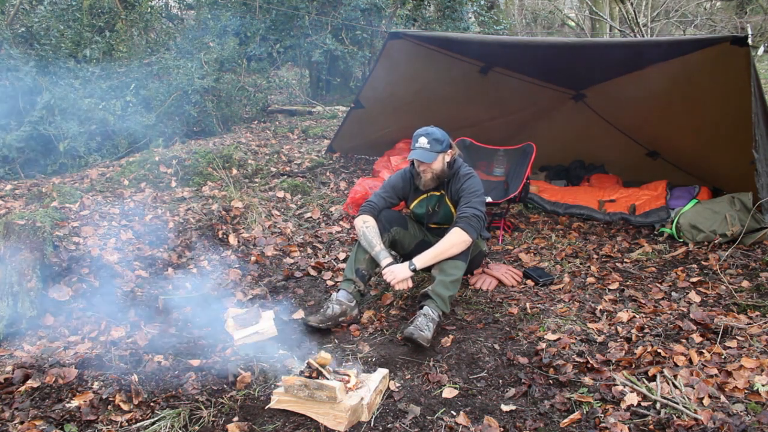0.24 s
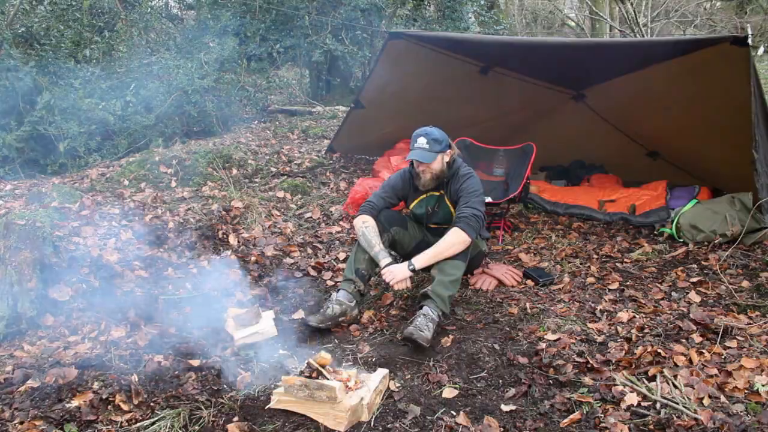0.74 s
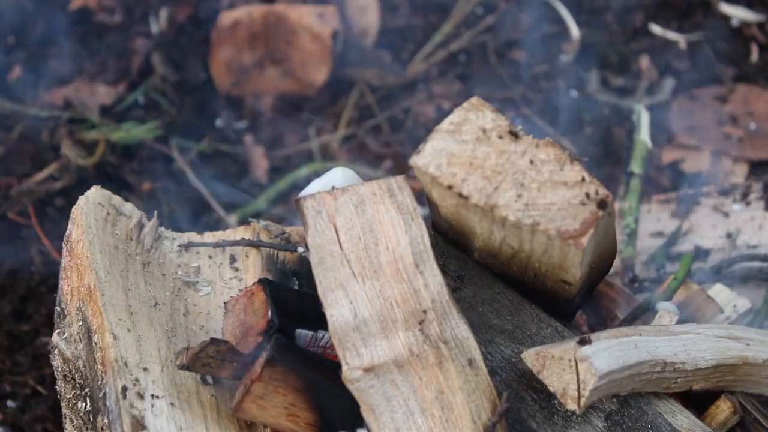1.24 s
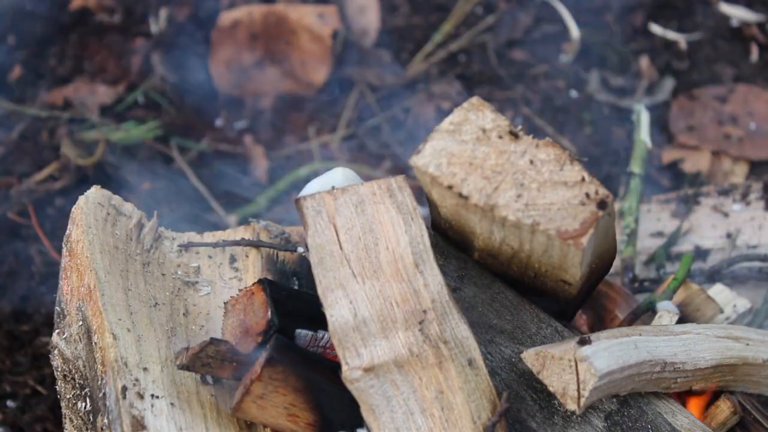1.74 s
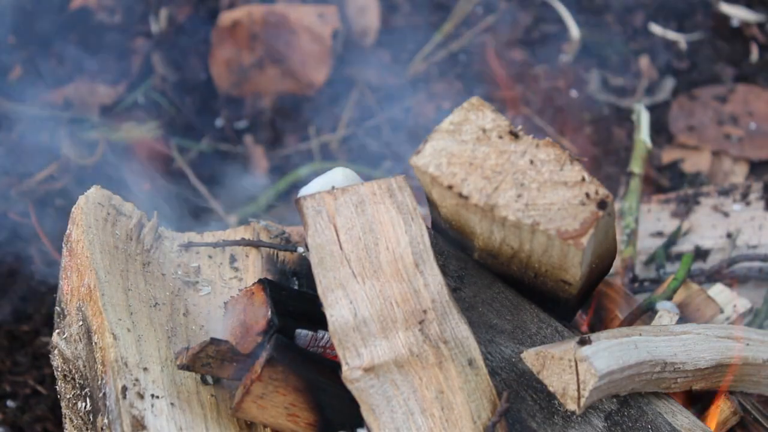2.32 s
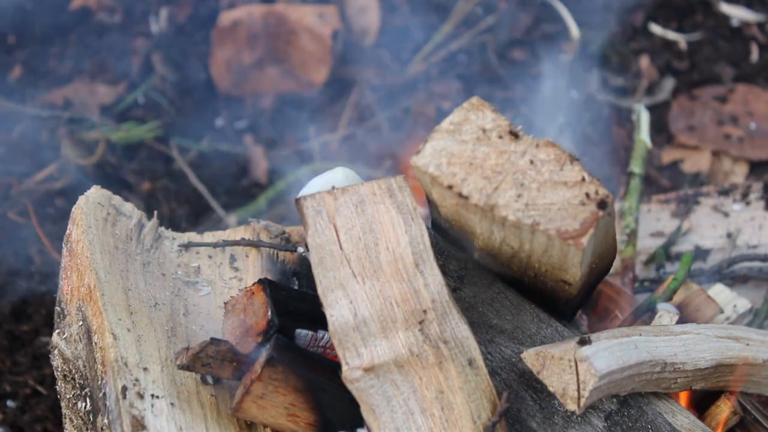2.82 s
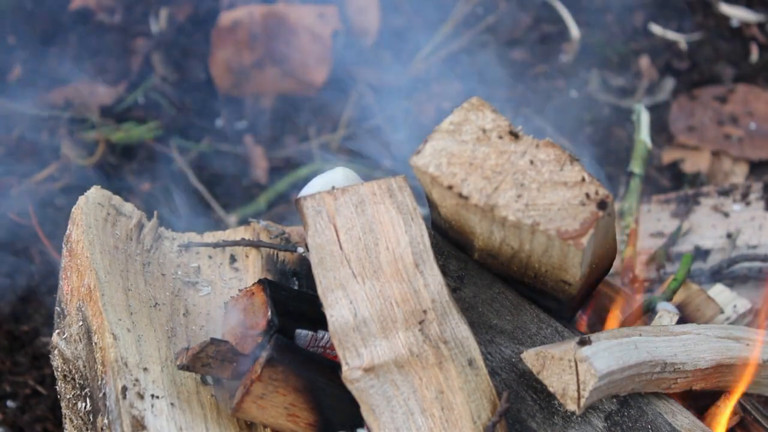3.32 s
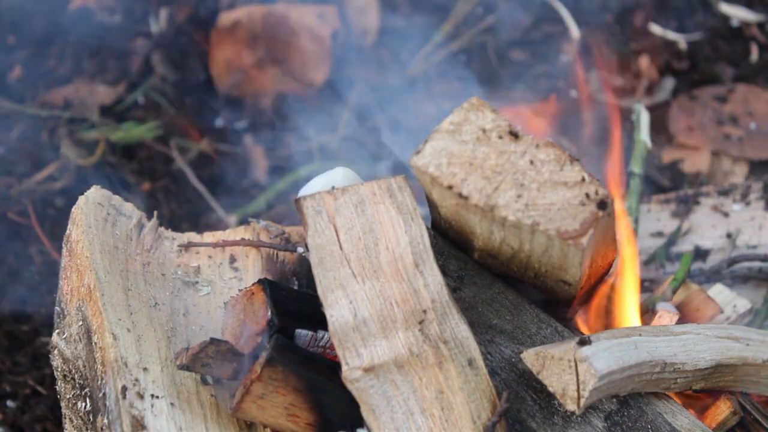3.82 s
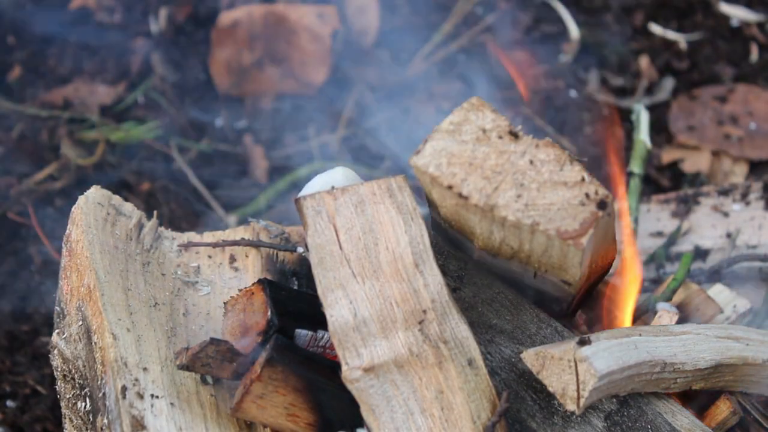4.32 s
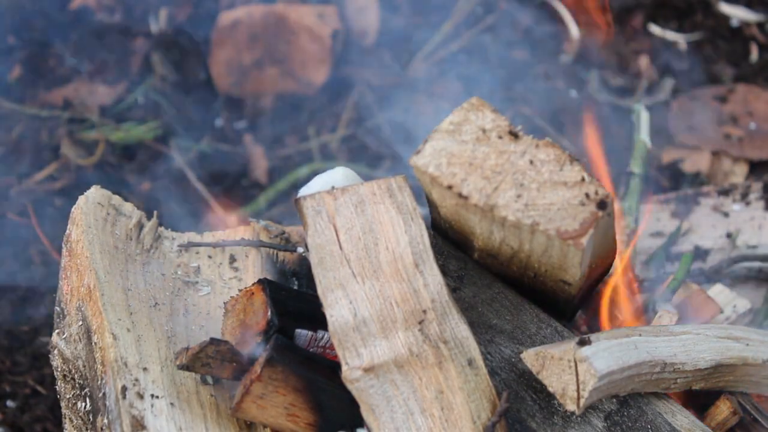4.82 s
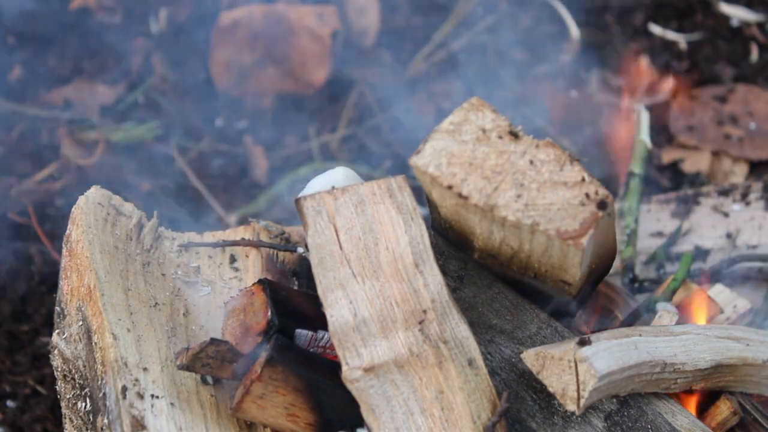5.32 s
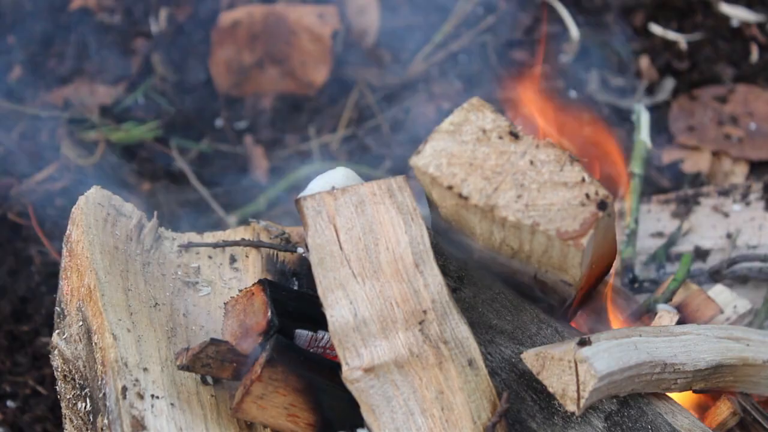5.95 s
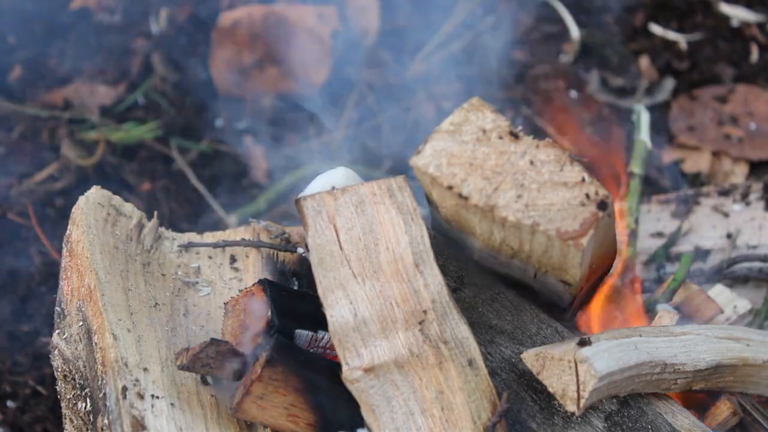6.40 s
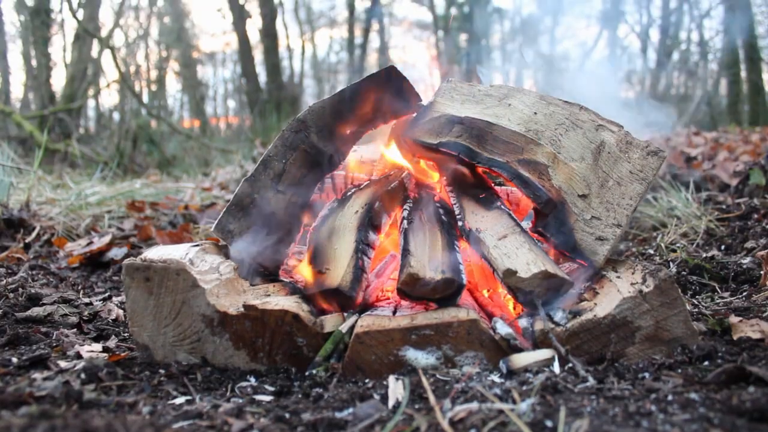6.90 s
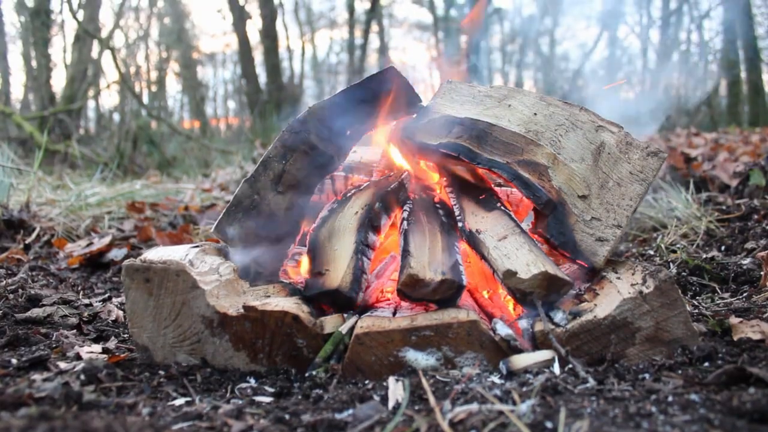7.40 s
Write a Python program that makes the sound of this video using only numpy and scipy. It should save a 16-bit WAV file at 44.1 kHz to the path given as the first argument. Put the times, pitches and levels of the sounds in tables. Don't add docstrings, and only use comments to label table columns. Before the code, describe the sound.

A damp-log campfire in woodland, mono, heard from three positions with hard changes. From 0 to 1 s it is distant: quiet, slightly growing steam hiss over low airy rumble, faint bird pips, a dull bark tick at 0.2 s, and a far engine drone swelling near 0.9 s. A single loud, bright knot crack with short log echoes comes at 0.9 s. At 1.0 s the fire is suddenly close: much louder, steady, finely sputtering hiss; the drone fades by 1.5 s. Two soft flame puffs come near 1.9 s. Thin birds whistle at 1.7 and around 3 s, then more busily from 5 to 6.5 s, with scattered tree echoes. At 6.55 s the view drops low: fuller hiss, slowly fading, stronger fluttering roar, repeated soft puffs, a brief high pip at 7.3 s and a small ringing tick at 7.4 s. It ends at 7.7 s.

```python
import sys
import numpy as np
from scipy import signal
from scipy.fft import rfft, irfft
from scipy.io import wavfile
from scipy.ndimage import uniform_filter1d

SR = 44100
rng = np.random.default_rng(int(sys.argv[2]) if len(sys.argv) > 2 else 0)


def makeup_ratio(level_db):
    decades = np.asarray(level_db, float) / 20
    return 10 ** decades


def file_out(sig):
    cols = np.atleast_2d(sig).T
    lim = np.clip(cols, -1, 1)
    pcm = np.round(lim * 32767).astype(np.int16)
    wavfile.write(sys.argv[1], SR, pcm)


N = 338209


def evened(x):
    return x / np.sqrt(np.mean(x ** 2) + 1e-20)


def add(mix, start_s, sound):
    part = mix[round(start_s * SR):][:len(sound)]
    part += sound[:len(part)]


def drift(size, span):
    span = max(int(span), 1)
    smooth = uniform_filter1d(rng.standard_normal(size), span)
    return evened(uniform_filter1d(smooth, span))


def coloured(points, size):
    hz = np.fft.rfftfreq(size, 1 / SR)
    point_hz, point_db = np.transpose(points)
    gain = makeup_ratio(np.interp(np.log(hz + 1), np.log(point_hz + 1), point_db, -120, -120))
    return evened(irfft(rfft(rng.standard_normal(size)) * gain, size))


def resonate(x, hz, width_hz):
    turn = np.exp(2j * np.pi * np.cumsum(hz * np.ones(len(x))) / SR)
    pole = np.exp(-np.pi * width_hz / SR)
    return 2 * (turn * signal.lfilter([1 - pole], [1, -pole], x / turn)).real


def fire(t, spot):
    # (frequency [Hz], level [dB])
    steam_far = [(760, -29), (1300, -0.5), (2190, -5.5), (2750, -3.5), (3630, -5.5), (5700, -4.5),
                 (7360, -0.5), (11800, -24), (14200, -29), (15100, -35)]
    steam_close = [(590, -12.5), (1000, -5.5), (1510, -4), (1720, -3), (1980, -6), (2160, -5), (3110, -1),
                   (3570, -2), (3910, 0.5), (4850, -1.5), (6590, 2), (8950, -6), (10000, -13.5),
                   (13300, -24), (15100, -39.5)]
    steam_low = [(1150, -13.5), (1500, -2), (2300, 1.5), (2820, -8.5), (3670, -0.5), (4670, -4.5),
                 (5390, -2), (6200, -8), (7350, -1), (8170, -5), (8850, -18), (9400, -16.5), (10000, -22),
                 (15100, -45)]
    # (frequency [Hz], level [dB])
    roar_far = [(8.8, -45), (15, -12), (65, 4), (81, -6), (98, -11), (161, -6.5), (240, -4.5), (325, -12.5),
                (1070, -11), (1400, -23), (1820, -63), (3080, -120)]
    roar_close = [(8.8, -43), (15, -21.5), (54, 2.5), (69, -2), (203, -15), (302, -14.5), (330, -15.5),
                  (409, -14), (597, -15), (677, -12.5), (1100, -15), (1430, -18), (2420, -120)]
    roar_low = [(8.8, -47), (15, -17), (32, -12), (59, 0.5), (146, -5.5), (545, -12.5), (731, -18.5),
                (802, -14.5), (1060, -21), (1200, -32), (1560, -62), (2640, -120)]
    # (steam [dB], roar [dB], steam growth [dB/s], roar growth [dB/s])
    spot_levels = [
        (-51, -47, 1, 0.5),
        (-39.5, -48, 0.1366, -0.1),
        (-37.5, -45, -0.35, 0.4),
    ]
    # (flame flutter [dB], steam sputter [dB])
    spot_moods = [
        (-0.2, 0.2),
        (0.34, .5),
        (1.8, .5),
    ]

    steam_points = (steam_far, steam_close, steam_low)[spot]
    roar_points = (roar_far, roar_close, roar_low)[spot]
    steam_db, roar_db, steam_growth, roar_growth = spot_levels[spot]
    flutter_db, sputter_db = spot_moods[spot]
    size, since_s = len(t), t - t[0]
    sputter = sputter_db * (drift(size, 860) + 0.27 * drift(size, 90))
    hiss = evened(coloured(steam_points, size) * makeup_ratio(sputter))
    flames = evened(coloured(roar_points, size) * makeup_ratio(flutter_db * drift(size, 180)))
    hiss = makeup_ratio(steam_db + steam_growth * since_s) * hiss
    return hiss + makeup_ratio(roar_db + roar_growth * since_s) * flames


def drone():
    # (time [s], frequency [Hz], level [dB])
    glide = [
        (0, 252, -61),
        (.3, 256, -55),
        (.9, 223, -49),
        (1.0, 230, -55),
        (1.03, 282, -55),
        (1.5, 280, -61),
    ]
    time_s, glide_hz, glide_db = np.transpose(glide)
    t = np.arange(0, time_s[-1], 1 / SR)
    hz = np.interp(t, time_s, glide_hz)
    tone = resonate(resonate(rng.standard_normal(len(t)), hz, 67), hz, 62)
    return makeup_ratio(np.interp(t, time_s, glide_db)) * evened(tone)


def note(length_s, from_hz, to_hz, slide_s, after_hz_per_s, db, swell):
    t = np.arange(0, length_s, 1 / SR)
    slide = (from_hz - to_hz) * np.maximum(1 - t / slide_s, 0) ** 1.6
    hz = to_hz + slide + after_hz_per_s * np.maximum(t - slide_s, 0)
    top, start_db, end_db = swell
    rising = t < top * length_s
    away = np.where(rising, 1 - t / (top * length_s), (t / length_s - top) / (1 - top))
    shape_db = np.where(rising, start_db, end_db) * away ** 1.15
    level = makeup_ratio(db + shape_db + 2.4 * drift(len(t), 180)) * signal.windows.tukey(len(t), .15)
    return np.sqrt(2) * level * np.sin(2 * np.pi * np.cumsum(hz) / SR)


def flock():
    # (start [s], length [s], frequency [Hz], level [dB])
    pip_calls = [
        (0, .05, 4385, -59),
        (1.04, .1, 3800, -54),
        (5.275, .06, 3835, -47.5),
        (5.485, .065, 3803, -43.5),
        (5.585, .04, 3805, -52),
        (5.55, .08, 7385, -52),
        (6.255, .045, 4100, -46.5),
        (7.315, .03, 6450, -49),
    ]
    # (start [s], length [s], from [Hz], bottom [Hz], level [dB])
    hook_calls = [
        (.17, .062, 6300, 4945, -55),
        (.582, .055, 5000, 4765, -57),
    ]
    # (start [s], length [s], from [Hz], to [Hz], level [dB])
    wisp_calls = [
        (.34, .15, 4590, 4310, -62),
        (.73, .17, 4110, 4450, -64),
        (3.05, .08, 3300, 3540, -53),
        (5.15, .09, 3130, 3330, -52),
        (5.88, .23, 2980, 3395, -51),
        (6.2, .07, 3980, 4080, -54),
    ]
    # (start [s], length [s], swoop [s], knee [Hz], level [dB])
    seep_calls = [
        (.742, .269, .06, 7330, -39),
        (1.67, .13, .09, 7440, -46),
        (3.22, .28, .11, 7470, -43),
    ]
    # (start [s], length [s], from [Hz], to [Hz], level [dB])
    slur_calls = [
        (.972, .045, 4080, 4520, -53),
        (2.94, .15, 2790, 3400, -44.5),
        (5.08, .07, 2950, 3250, -49),
        (6.01, .1, 6420, 6280, -48),
        (6.46, .06, 6250, 6180, -51),
    ]
    pip_swell, seep_swell, slur_swell = (.45, -6, -8), (.28, -15, -14), (.38, -8, -14)
    wisp_swell = (.4, -3, -4)

    birds = np.zeros(N)
    for start_s, length_s, hz, db in pip_calls:
        add(birds, start_s, note(length_s, hz, hz, length_s, 0, db, pip_swell))
    for start_s, length_s, from_hz, bottom_hz, db in hook_calls:
        add(birds, start_s, note(length_s, from_hz, bottom_hz, .55 * length_s, 2500, db, pip_swell))
    for start_s, length_s, from_hz, to_hz, db in wisp_calls:
        add(birds, start_s, note(length_s, from_hz, to_hz, length_s, 0, db, wisp_swell))
    for start_s, length_s, swoop_s, knee_hz, db in seep_calls:
        add(birds, start_s, note(length_s, knee_hz + 780, knee_hz, swoop_s, -1500, db, seep_swell))
    for start_s, length_s, from_hz, to_hz, db in slur_calls:
        add(birds, start_s, note(length_s, from_hz, to_hz, length_s, 0, db, slur_swell))
    return birds


def trees(x, t60_s, wet_db):
    t = np.arange(SR // 2) / SR
    hits = (rng.random(len(t)) < .05) * (t > .008)
    taps = rng.standard_normal(len(t)) * hits * makeup_ratio(-60 * t / t60_s)
    return x + makeup_ratio(wet_db) * signal.fftconvolve(x, taps / np.linalg.norm(taps))[:len(x)]


def bark_ticks():
    # (time [s], peak [dB], frequency [Hz], width [Hz])
    tick_events = [
        (.1978, -31, 6400, 1500),
        (7.423, -27.5, 5000, 400),
    ]
    ticks = np.zeros(N)
    t = np.arange(400) / SR
    for start_s, db, hz, width_hz in tick_events:
        envelope = np.exp(-np.pi * width_hz * t) * (1 - np.exp(-t / .00009))
        mode = envelope * np.sin(2 * np.pi * hz * t)
        add(ticks, start_s, makeup_ratio(db) * mode / mode.max())
    return ticks


def snap():
    # (frequency [Hz], level [dB])
    knot_colour = [(300, -22), (1000, -17), (1800, -10), (2300, -10), (2800, -2.5), (3400, -4),
                   (4600, -8.5), (6000, 0), (7200, -7), (8400, -8.5), (9400, -21), (10300, -18),
                   (13000, -33), (15000, -56)]
    # (delay [ms], level [dB])
    bark_bounces = [
        (2.2, -23),
        (3.6, -16),
        (5.2, -24),
        (6.6, -21),
        (11.8, -23),
    ]
    hz = np.fft.rfftfreq(4096, 1 / SR)
    point_hz, point_db = np.transpose(knot_colour)
    log_gain = np.log(makeup_ratio(np.interp(np.log(hz + 1), np.log(point_hz), point_db)))
    log_gain = np.concatenate([log_gain, log_gain[-2:0:-1]])
    crack = np.fft.ifft(np.exp(log_gain - 1j * signal.hilbert(log_gain).imag)).real[:300]
    path = np.zeros(900)
    for delay_ms, loss_db in bark_bounces:
        smear = np.diff(rng.standard_normal(45)) * np.hanning(44) / 4
        add(path, delay_ms / 1000, makeup_ratio(loss_db) * smear)
    path[[0, 18]] = 1, .15
    return makeup_ratio(-5.5) * np.convolve(crack / abs(crack).max(), path)


def flame_puffs():
    # (time [s], peak [dB])
    puff_events = [(1.894, -34), (1.948, -36), (6.644, -32), (6.699, -32.5), (6.737, -33), (6.799, -29),
                   (6.901, -34), (7.004, -34), (7.093, -28), (7.149, -35), (7.281, -34), (7.314, -31),
                   (7.485, -31.5), (7.564, -31), (7.612, -28)]
    puffs = np.zeros(N)
    puff_ms = 4.4
    u = np.arange(-1.5, 4, 2000 / (puff_ms * SR))
    push = -np.exp(-(u / 0.32) ** 2) + 0.65 * np.exp(-((u - 1.1) / 0.85) ** 2)
    for start_s, db in puff_events:
        add(puffs, start_s, makeup_ratio(db) * (push - push.mean()))
    return puffs


def scene():
    move_times = [
        0,
        1.011,
        6.553,
        7.7,
    ]
    birds = flock()
    snaps = bark_ticks()
    add(snaps, .9066, snap())
    near = flame_puffs()
    add(near, 0, drone())
    for spot, (start_s, end_s) in enumerate(zip(move_times, move_times[1:])):
        here = slice(round(start_s * SR), min(round(end_s * SR), N))
        echoes = trees(birds[here], .35, -7) + trees(snaps[here], .12, -19)
        add(near, start_s, fire(np.arange(N)[here] / SR, spot) + echoes)
    return np.array([near, near])


def low_pass(x):
    return signal.sosfilt(signal.butter(12, 15170, fs=SR, output="sos"), x)


def record(dry):
    return low_pass(dry)


dry = scene()
out = record(dry)
file_out(out)
```